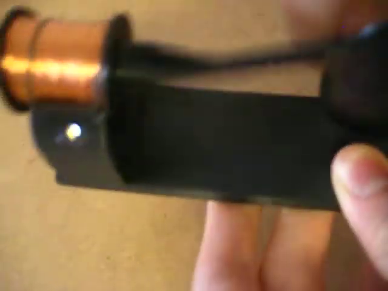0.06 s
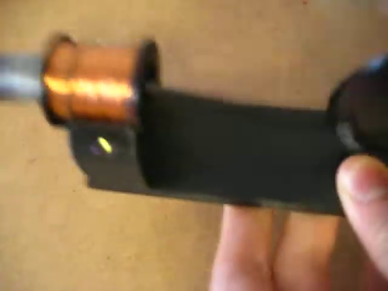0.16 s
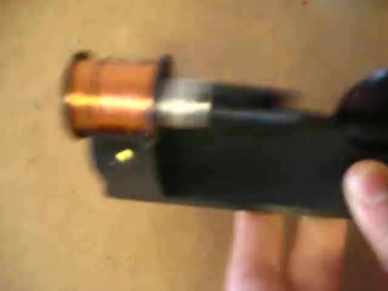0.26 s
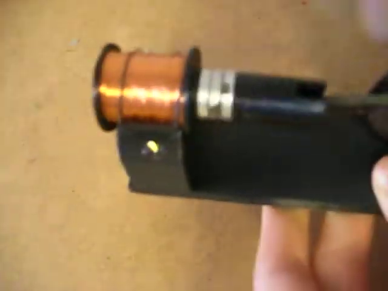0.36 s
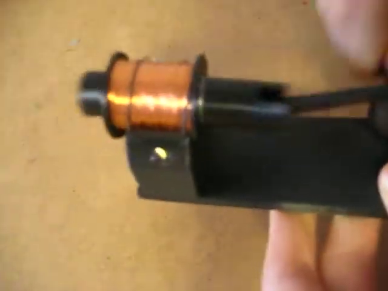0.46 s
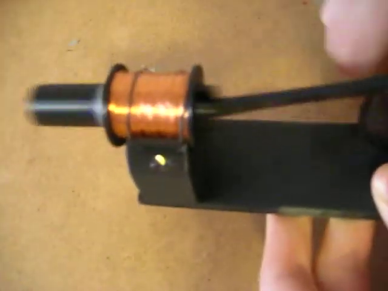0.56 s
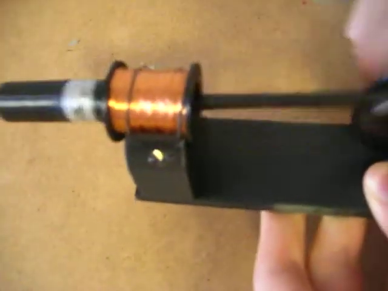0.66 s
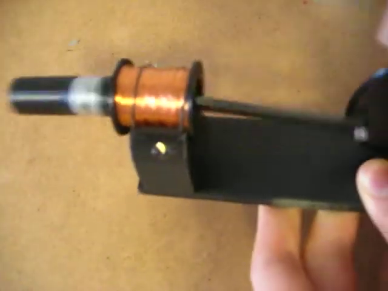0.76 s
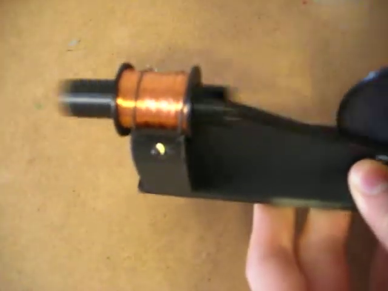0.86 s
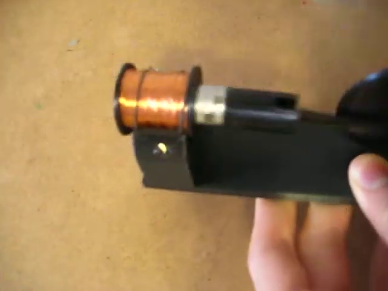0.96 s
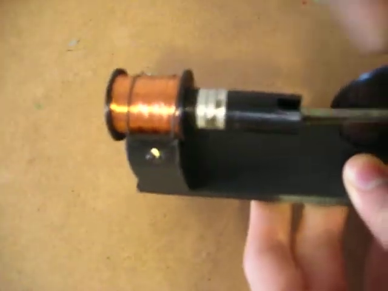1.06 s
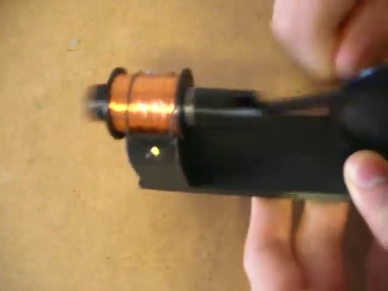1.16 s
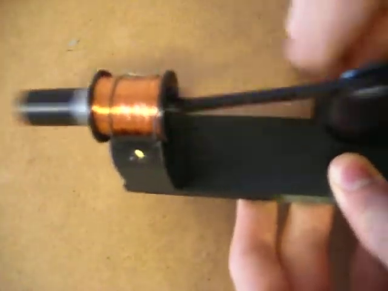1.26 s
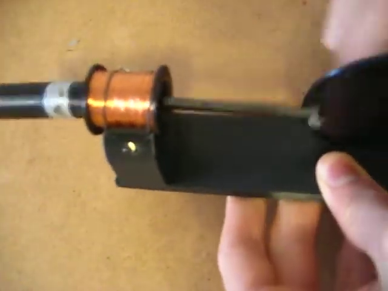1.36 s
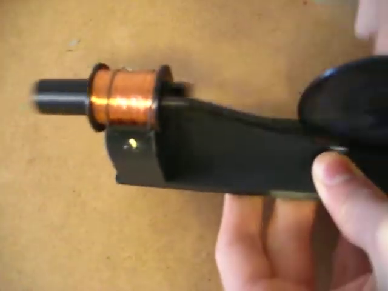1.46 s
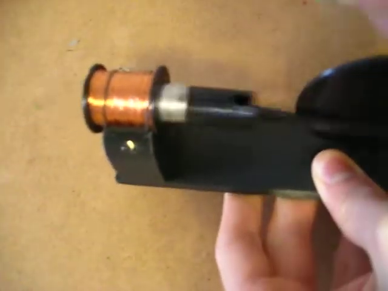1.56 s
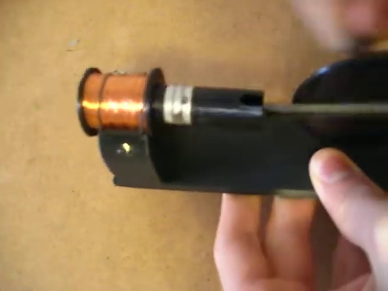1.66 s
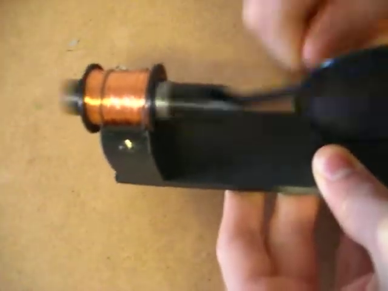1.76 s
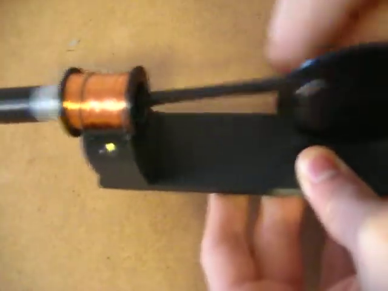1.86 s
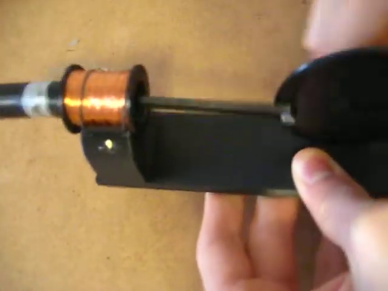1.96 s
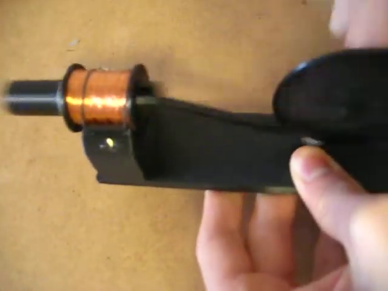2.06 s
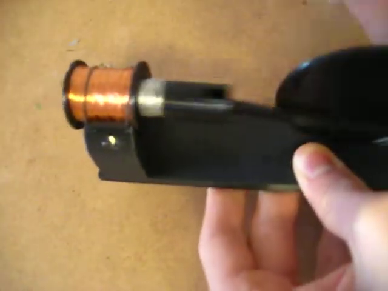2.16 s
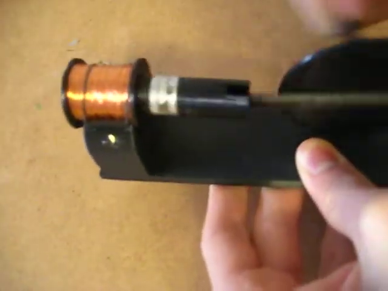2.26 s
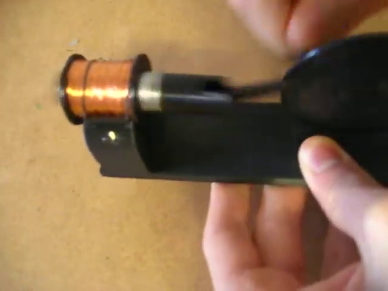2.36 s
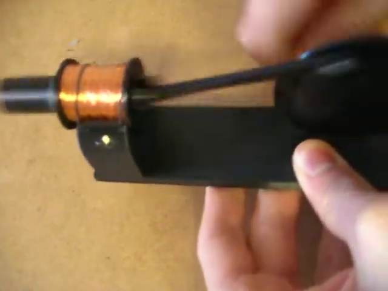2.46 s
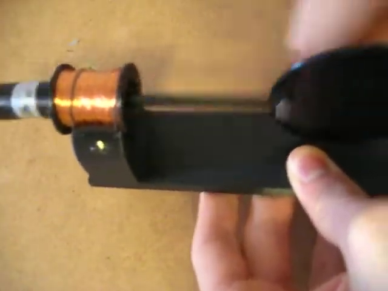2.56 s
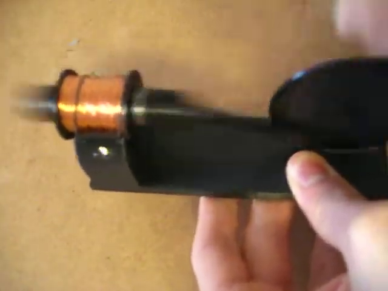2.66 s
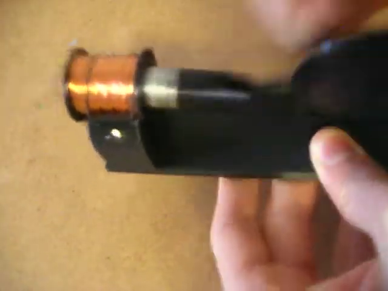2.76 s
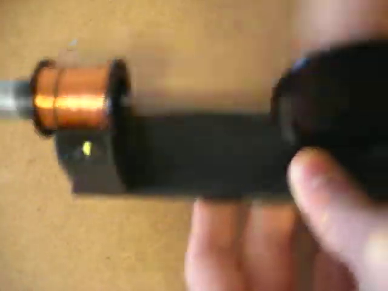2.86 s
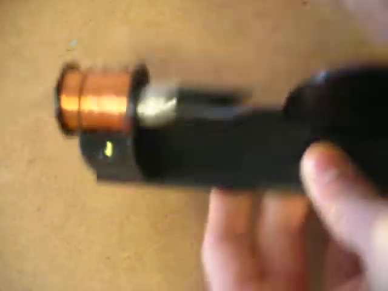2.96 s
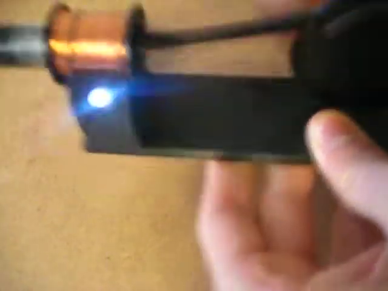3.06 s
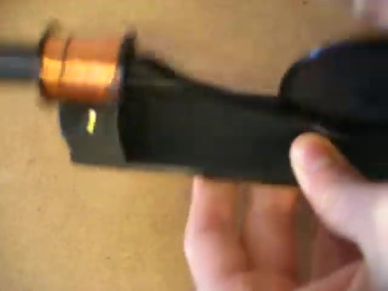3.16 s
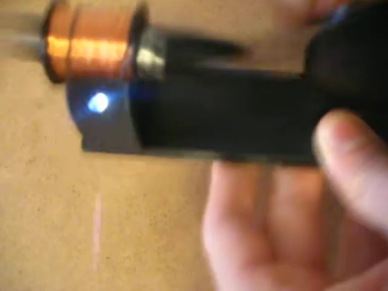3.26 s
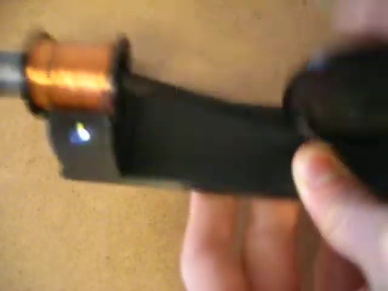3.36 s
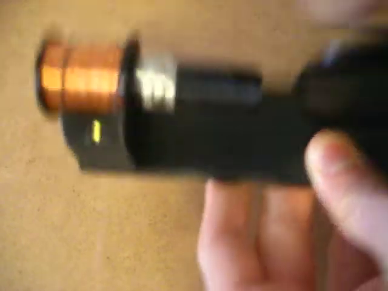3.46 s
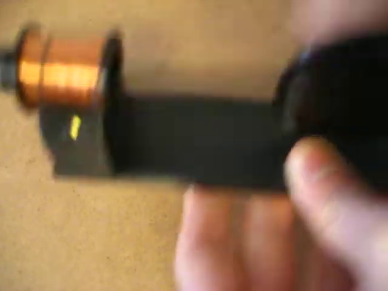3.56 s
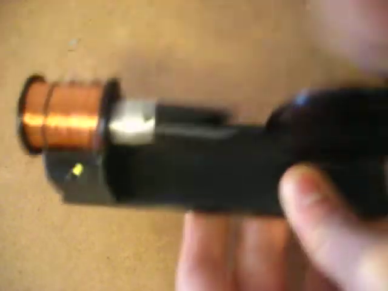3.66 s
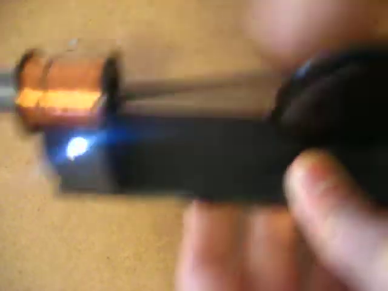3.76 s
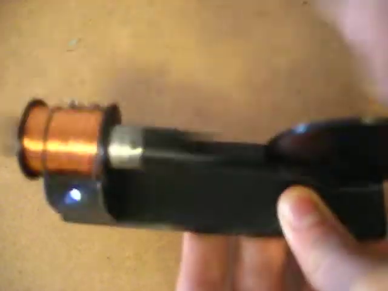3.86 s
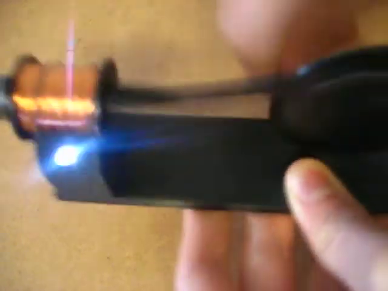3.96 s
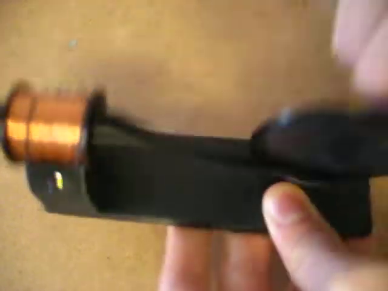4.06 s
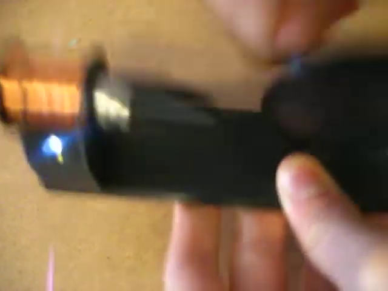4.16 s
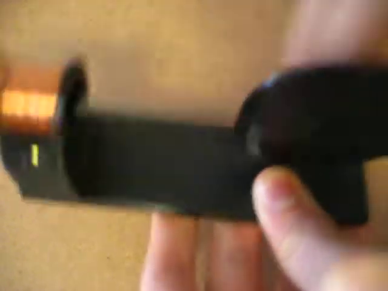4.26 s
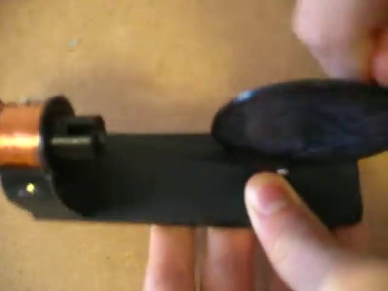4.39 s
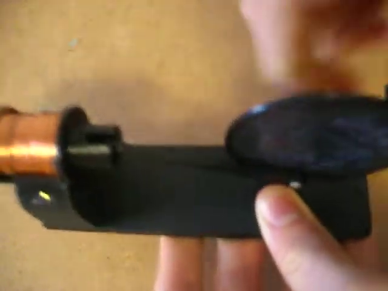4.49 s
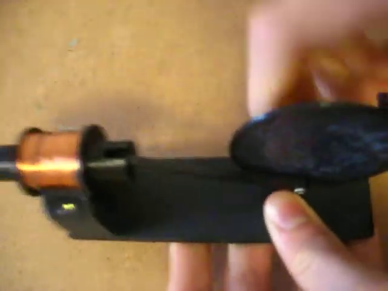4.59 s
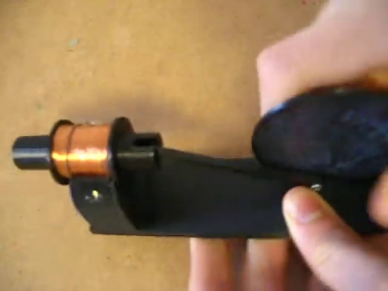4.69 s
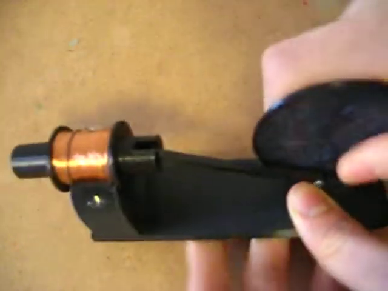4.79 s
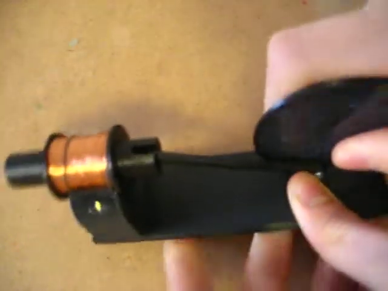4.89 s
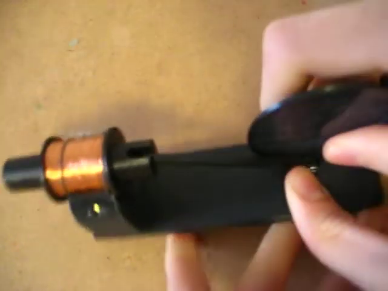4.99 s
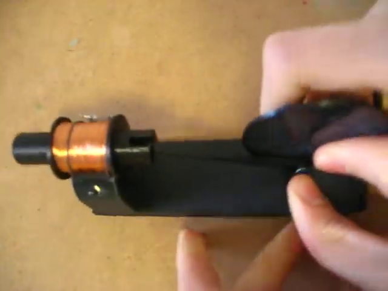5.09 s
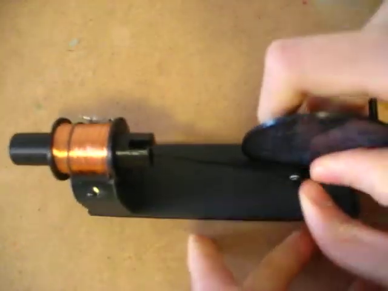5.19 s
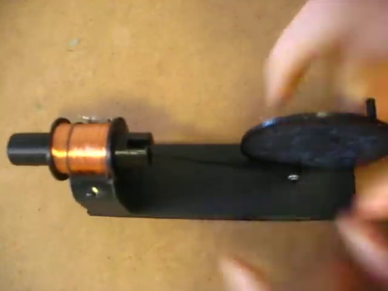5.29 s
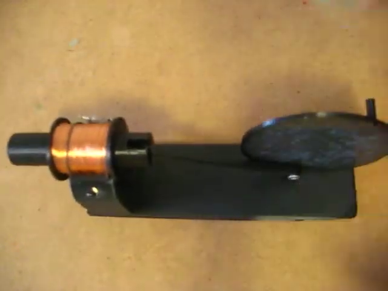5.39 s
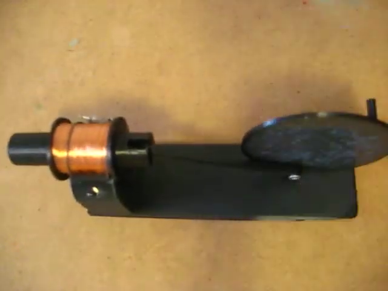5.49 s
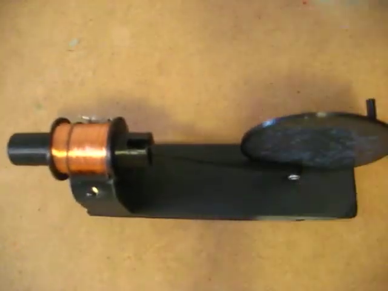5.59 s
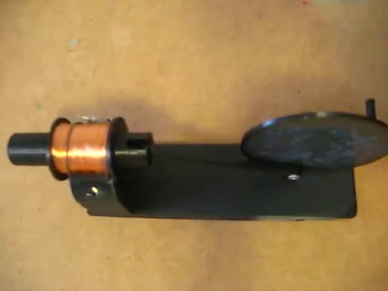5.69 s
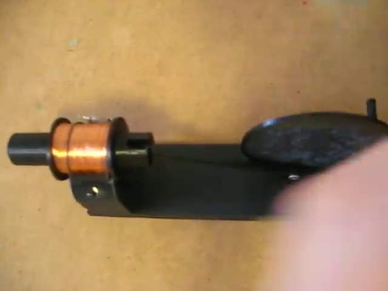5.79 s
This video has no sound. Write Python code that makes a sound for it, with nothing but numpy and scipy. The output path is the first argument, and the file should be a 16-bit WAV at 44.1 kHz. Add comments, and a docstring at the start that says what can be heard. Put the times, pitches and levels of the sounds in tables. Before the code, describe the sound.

Close to a small microphone in a quiet room, a loose plastic rod shuttles back and forth through a coil former, scraping and clicking in a rough rhythm. The strokes quicken into a dense rattle, stop just after four seconds, leave a few faint ticks and slides, then the frame lands on a table with two woody clacks, and near-quiet hiss follows.

```python
"""A plastic hand generator is cranked close to a small microphone in a quiet room.
From the start a loose rod with a magnet shuttles through a coil former: friction and impacts
excite the decaying modes of frame, base plate and rod, over filtered noise and a faint reverberation.
The crank stops and soft slides of rod and fingers stir the same modes. Then the frame is set down
with two clacks, which ring the low modes of a table top, and faint slides follow to the end."""
import sys
import numpy as np
from scipy import signal
from scipy.fft import rfft, irfft, next_fast_len
from scipy.io import wavfile

SR = 44100
rng = np.random.default_rng(int(sys.argv[2]) if len(sys.argv) > 2 else 0)


def rack_gain(trim_db):
    """Turn a fader trim in dB into the linear factor to multiply a signal by."""
    fader = np.asarray(trim_db, float)
    return 10 ** (fader / 20)


def inscribe(sig):
    """Save sig as 16-bit PCM at rate SR to the path in sys.argv[1].

    A 1-D sig is mono; a 2-D sig holds one channel per row.
    Samples are clipped to [-1, 1] before scaling.
    """
    pcm = np.round(np.clip(np.atleast_2d(sig).T, -1, 1) * 32767)
    wavfile.write(sys.argv[1], SR, pcm.astype(np.int16))


N = 257088

# All levels are relative: trims, gains and normalised shares may follow.
# Spectrum of rumble and hiss: (frequency [Hz], density level [dB])
ROOM_SPECTRUM = [(12, -39), (20, -10.5), (81, -10.5), (164, -4.5), (331, -5.5), (438, -9.5), (687, -11),
                 (880, -11.5), (1050, -9.5), (1250, -13), (3040, -15.5), (6130, -16.5), (10400, -21.5),
                 (12000, -23), (15000, -13.5), (16400, -44)]
# Course of that noise: (time [s], level [dB])
ROOM_COURSE = [(0, -51), (2.2, -50.5), (4.3, -56.5), (4.5, -49.5), (5.0, -48.5), (5.4, -50), (5.83, -47.5)]
# Strokes of the rod, inward first, then outward and inward in turn:
# (start [s], bite going out or lull coming in [s], frame gain [dB], base plate gain [dB], rod gain [dB])
ROD_STROKES = [(-.07, 0.055, -3, 4.5, 0), (0.306, 0.418, -1.5, 2.8, -1), (0.703, 0.86, -2, -1.5, -3),
               (1.046, 1.118, 0.5, -2.5, 2), (1.34, 1.461, 0.4, -6.5, -1), (1.65, 1.725, 1.9, -6.5, 2),
               (1.928, 2.075, -0.4, -5, -3), (2.261, 2.339, 1.5, -0.5, 0), (2.559, 2.636, 0, -6, 2),
               (2.707, 2.749, 0, -0.5, -1), (2.827, 2.912, -0.2, -5, 0.8), (2.977, 3.003, 0.3, 0.5, 1.5),
               (3.092, 3.16, 2, 2, 3), (3.215, 3.242, 1, -3.5, 1), (3.312, 3.382, 0.3, 2.5, 2.5),
               (3.435, 3.464, -1.5, 1, 0.8), (3.529, 3.613, -3, 0.5, 0), (3.662, 3.692, -0.5, -0.5, -0.5),
               (3.764, 3.832, -1.5, -2, 2.7), (3.881, 3.917, -4, -4, -2.5), (3.99, 4.056, -1, 2, 1),
               (4.114, 4.145, -0.8, 1.5, -1), (4.228, 4.297, -1.1, 5, -5)]
# Scrape through one turn of the crank, out then in, for slow and for quick strokes:
# (crank angle [turns], frame level [dB], base plate level [dB], rod level [dB], ring at the contact [Hz])
SLOW_SCRAPE = [(0, -45, -56, -60, 2540), (0.031, -38, -37.5, -29.5, 6850), (.08, -31, -34, -45.5, 1390),
               (.15, -21, -35, -28.5, 4530), (.22, -26.5, -31.5, -37, 1860), (0.339, -29, -35.5, -42, 1940),
               (.39, -26, -33.5, -27.5, 6380), (.47, -29.5, -40, -29, 6340), (.5, -46.5, -67, -52.5, 3480),
               (.57, -25.5, -25.5, -33.5, 2230), (0.699, -23, -37, -26.5, 4000),
               (.75, -28.5, -47, -40, 2070), (.79, -26, -35, -27.5, 6400), (.88, -24, -39.5, -31.5, 2130),
               (.94, -32.5, -38.5, -37, 2140), (1, -52, -57, -47, 2590)]
FAST_SCRAPE = [(0, -40, -69, -41, 2230), (.07, -34.5, -26, -39.5, 1390), (0.148, -18, -34, -21, 4600),
               (.24, -26, -41, -28.5, 4720), (.34, -32.5, -49, -37, 1970), (.43, -27, -42, -27.5, 6650),
               (.5, -36, -49, -45, 1990), (.58, -25.5, -35.5, -29.5, 2000), (.68, -22.5, -42, -27.5, 3700),
               (.75, -31.5, -42, -38, 2500), (.81, -24, -38.5, -24, 4030), (.88, -25, -35.5, -27, 4030),
               (1, -38.5, -52, -46, 2200)]
# Modes of each part, and of a small hollow in the frame: (frequency [Hz], level [dB], t60 [s])
FRAME_MODES = [(1626, -9.5, 0.034), (1873, -3.5, 0.023), (2062, -0.5, 0.015), (2442, -1, 0.0084),
               (2722, -0.5, 0.0063), (3246, 1.5, 0.0071), (3680, -2, 0.013), (4050, 0, 0.011),
               (4490, 0, 0.014), (5073, 2, 0.0092)]
BASE_MODES = [(674, -22.5, 0.015), (730, -13.5, 0.063), (908, -9.5, 0.027), (1006, -3, 0.045),
              (1100, -0.5, 0.038), (1264, 5, 0.018), (1385, 5, 0.011)]
ROD_MODES = [(5900, 1.5, 0.0047), (6324, -7.5, 0.015), (6645, -1, 0.0052), (7480, 1, 0.0027),
             (8700, 1, 0.0037), (9700, -4.5, 0.0069), (10670, -2, 0.004), (11780, -1.5, 0.0034),
             (13300, -11, 0.0049)]
HOLLOW_MODES = [(5530, 0.93, 0.023)]
# Clear knocks: (time [s], frame level [dB], base plate level [dB], rod level [dB], strongest ring [Hz])
CLEAR_KNOCKS = [(.0022, -10.5, -29, -14.5, 4450), (.015, -13.5, -35, -16.5, 4200),
                (.029, -12.5, -20, -27, 3830), (.08, -16, -44, -24, 2030), (.108, -16, -19, -19, 3000),
                (.1505, -9.5, -41, -15, 5500), (.1803, -14, -23, -13, 3180), (.2236, -13, -27, -17, 5060),
                (.2338, -17.5, -24.5, -12.5, 4050), (.2459, -19, -43, -33, 2030),
                (.2631, -22, -25, -18, 8760), (.3185, -19.5, -43, -20, 9600), (.3656, -18, -27, -32, 1400),
                (.4078, -11, -39, -22, 1770), (.4273, -23, -34, -26, 4700), (.4427, -3.5, -29, -13, 3370),
                (.4673, -41, -11, -31, 1410), (.477, -14, -27, -32, 2010), (.5002, -15, -22, -29, 1700),
                (.534, -14, -35, -39, 5040), (.5968, -15, -19, -34, 1900), (.6298, -17, -29.5, -26.5, 5400),
                (.6561, -14, -32, -17, 6300), (.6725, -18, -29, -23, 5900), (.7307, -23, -19, -35, 1120),
                (.7745, -14, -27, -18, 6450), (.8198, -10.5, -35, -23, 2110),
                (.8327, -10.5, -36, -13.5, 3660), (.8698, -13, -48, -14.5, 6500),
                (.881, -27, -49, -15, 3790), (.9013, -27, -47, -20, 3880), (.92, -39, -43, -19.5, 6860),
                (.9529, -37, -40, -24, 4090), (1.055, -30, -45, -21, 7250), (1.1145, -8, -37, -14.5, 5200),
                (1.1463, -8, -38, -21, 2640), (1.186, -18, -15, -40, 1400), (1.2238, -9, -33, -26, 1860),
                (1.2634, -12, -16, -27, 3200), (1.292, -19, -34, -20, 6100), (1.3047, -26, -36, -19, 6300),
                (1.423, -10, -38, -33, 2480), (1.4347, -13.5, -44, -29, 3900),
                (1.448, -9.5, -46, -15, 5100), (1.4889, -13, -43, -18.5, 2520),
                (1.5104, -9, -43, -14, 6450), (1.7023, -16, -37, -20, 3380),
                (1.7194, -14.5, -42, -24, 4100), (1.7512, -7.5, -43, -22, 3680),
                (1.803, -11, -44, -25, 1950), (1.8473, -11.5, -33, -16, 6270),
                (1.8629, -30, -37.5, -14, 6400), (1.8996, -17, -44.5, -17, 6570),
                (1.9928, -30.5, -34, -14.5, 6200), (2.0461, -10, -42, -30, 2450),
                (2.058, -7.5, -43, -16, 3660), (2.1071, -8.5, -34, -15, 5700),
                (2.1181, -13, -44, -15, 5260), (2.3207, -11.5, -24, -21, 2980),
                (2.3311, -9.5, -38, -29, 4680), (2.369, -9, -13, -23.5, 1850), (2.446, -12, -18, -26, 1960),
                (2.4942, -19, -33, -15.5, 6300), (2.5488, -14.5, -53, -16.5, 6440),
                (2.5996, -6, -44, -19, 5130), (2.6229, -7, -43, -14, 4940), (2.6617, -15, -44, -13.5, 4900),
                (2.7419, -20, -11.5, -14.5, 4640), (2.7693, -8.5, -17.5, -26, 2700),
                (2.818, -15.5, -27, -15.5, 7080), (2.8906, -7.5, -46, -15, 3630),
                (2.9252, -24, -29, -14, 3320), (2.9982, -18, -26, -17.5, 6150),
                (3.0185, -18, -12.5, -20, 1380), (3.0966, -16, -46, -20.5, 9820),
                (3.1108, -17, -40, -27, 2020), (3.142, -13, -21, -32, 2600), (3.2311, -8.5, -40, -22, 5200),
                (3.2496, -11.5, -9, -19, 1350), (3.3201, -21, -44, -19, 6720), (3.38, -17, -40, -17, 6180),
                (3.4816, -7.5, -42, -19, 4860), (3.5122, -18, -48, -32, 2070),
                (3.5742, -12, -27, -30, 1980), (3.5927, -11, -47, -20, 2190),
                (3.6214, -16.5, -38, -17, 4950), (3.6887, -19, -19, -12, 6460),
                (3.7078, -15, -50, -17.5, 4760), (3.8135, -9, -37, -20, 5530), (3.916, -9, -51, -14, 4500),
                (3.9297, -9.5, -27, -29, 5060), (4.035, -13, -46, -25, 3400),
                (4.0733, -13, -16, -15.5, 2060), (4.1346, -10, -26, -18, 4470),
                (4.1574, -10.5, -9, -12.5, 1390), (4.2739, -35, -15.5, -15.5, 8700),
                (4.3262, -10.5, -16, -13.5, 3720), (4.426, -17.5, -20, -28.5, 4100),
                (4.442, -32, -43, -50, 3420), (4.463, -44, -38, -55, 950), (4.578, -33.5, -60, -37, 3600),
                (4.6254, -27.5, -19, -49, 920), (4.6755, -37, -55, -34, 5700),
                (4.7437, -19, -51, -19.5, 5600), (4.8259, -29.5, -61, -47, 3750),
                (4.8501, -29, -33, -35.5, 5150), (4.9192, -31, -57, -39, 3220),
                (5.0349, -8.5, 1.5, -14, 880), (5.063, -25, -33, -39, 1170),
                (5.1268, -8, -5.5, -11.5, 1130), (5.1377, -41, -17, -48, 1240),
                (5.2054, -20.5, -39, -39, 4320), (5.2121, -24, -46, -26.5, 5160),
                (5.7034, -33.5, -34, -57, 1930)]
# Low thumps of the overloaded microphone at some knocks: (time [s], level [dB])
OVERLOAD_THUMPS = [(0.831, -17.5), (0.87, -31), (1.447, -28), (2.624, -35), (3.484, -29), (4.625, -32),
                   (4.745, -32)]
# Soft slides as the crank stops and after: (start [s], length [s], frame level at start [dB],
# slope [dB/s], base plate over frame [dB], ring [Hz])
SOFT_SLIDES = [(4.336, 0.177, -36.5, -120, 4, 920), (4.573, 0.057, -47.5, -5, -16, 8500),
               (4.648, 0.049, -45, -1, -10, 2620), (4.746, .08, -49.5, -5, -6.5, 1100),
               (4.827, 0.24, -45, 15, -13.5, 5340), (5.038, 0.094, -34.5, -90, 3, 900),
               (5.133, 0.12, -44, -15, -7, 1000), (5.257, 0.035, -45.5, -5, -4, 3540),
               (5.443, 0.056, -60, -5, 4, 1830), (5.58, .3, -62, 55, -4.5, 3780)]
# Blows of the frame on the table: (time [s], level [dB])
TABLE_LANDINGS = [(5.0354, -22), (5.1278, -23.5), (5.16, -35), (5.21, -54)]
# Modes of the table top: (frequency [Hz], level [dB], t60 [s])
TABLE_MODES = [(147, -10.5, 0.2), (282, -16, 0.067), (335, -1.5, 0.028), (467, -6, 0.022),
               (563, -8.5, 0.08), (650, -2.5, 0.034), (840, -6, 0.037), (958, -4, 0.052)]

CRANK_STOPS_S = 4.345


def rms_one(x):
    """Normalisation: scale to unit rms."""
    return x / np.sqrt(np.mean(x ** 2) + 1e-20)


def in_time(rows):
    """Linear interpolation: table columns joined by straight lines, one value a sample."""
    s, *columns = np.transpose(rows)
    return [np.interp(np.arange(N) / SR, s, c) for c in columns]


def drift(rate_hz):
    """Low-passed noise: a slow random wander of unit rms."""
    r = np.exp(-2 * np.pi * rate_hz / SR)
    noise = rng.standard_normal(N + 8000)
    return rms_one(signal.lfilter([1], [1, -2 * r, r * r], noise)[8000:])


def ring(force, hz, t60):
    """Damped resonance: a unit click sets a sine of height 1 ringing."""
    r = rack_gain(-60 / (t60 * SR))
    w = 2 * np.pi * hz / SR
    return signal.lfilter([0, np.sin(w)], [1, -2 * r * np.cos(w), r * r], force + 1e-18)


def dying(clicks, seconds):
    """Exponential relaxation: each unit click becomes a decaying envelope of unit energy."""
    r = np.exp(-1 / (seconds * SR))
    return signal.lfilter([np.sqrt(1 - r * r)], [1, -r], clicks + 1e-18)


def nearness(hz, centre_hz, octaves):
    """Bell-shaped selectivity: 1 on the centre, falling away in log pitch."""
    return np.exp(-(np.log2(hz / centre_hz) / octaves) ** 2)


def room_tone():
    """Spectrally shaped noise: low rumble and microphone hiss, wavering slightly."""
    hz, db = np.transpose(ROOM_SPECTRUM)
    size = next_fast_len(N)
    bin_hz = np.arange(size // 2 + 1) * SR / size
    colour = rack_gain(np.interp(np.log(bin_hz + 1), np.log(hz), db))
    noise = irfft(rfft(rng.standard_normal(size)) * colour, size)[:N]
    level_db = in_time(ROOM_COURSE)[0] + 1.1 * drift(24)
    return rack_gain(level_db) * rms_one(noise)


def turn_shape():
    """Crank kinematics: the angle runs evenly between marked moments and sets the scrape's level and ring."""
    bite_turns, lull_turns, fast_stroke_s = 0.15, 0.75, 0.15
    start, mark, *gains = np.transpose(ROD_STROKES)
    end = np.append(start[1:], CRANK_STOPS_S)
    inward = np.arange(len(start)) % 2 == 0
    t = np.arange(N) / SR
    k = np.clip(np.searchsorted(start, t, side="right") - 1, 0, None)  # stroke under way
    begin = 0.5 * inward[k]
    at_mark = np.where(inward, lull_turns, bite_turns)[k]
    before_mark = begin + (at_mark - begin) * (t - start[k]) / (mark - start)[k]
    after_mark = at_mark + (begin + 0.5 - at_mark) * (t - mark[k]) / (end - mark)[k]
    turns = np.where(t < mark[k], before_mark, after_mark)
    quick = (end - start)[k] < fast_stroke_s
    slow, fast = np.transpose(SLOW_SCRAPE), np.transpose(FAST_SCRAPE)
    *levels, contact_hz = [np.where(quick, np.interp(turns, fast[0], f), np.interp(turns, slow[0], s))
                           for s, f in zip(slow[1:], fast[1:])]
    levels_db = [np.where(t < CRANK_STOPS_S, db + gain[k], -90) for db, gain in zip(levels, gains)]
    return levels_db, contact_hz


def scrape(modes, level_db, roughness, wander_db, trim_db, favoured_db):
    """Friction-driven modes: a rough force whose share among the modes wanders with the place of contact."""
    share = np.array([rack_gain(db + favour + wander_db * drift(10.2))
                      for (hz, db, t60), favour in zip(modes, favoured_db)])
    share = share / np.sqrt(np.sum(share ** 2, axis=0))
    rings = [rms_one(ring(roughness * rng.standard_normal(N), hz, t60)) for hz, db, t60 in modes]
    return rack_gain(level_db + trim_db) * np.sum(share * rings, axis=0)


def all_knocks(levels_db, contact_hz):
    """Random impacts: lesser knocks follow the scrape around them and join the clear ones."""
    count, spread_db, ring_spread_octaves = 120, 1.5, 0.25
    over_scrape_db = (9, 1.5, 9.5)  # frame, base plate, rod
    chance = rng.standard_normal((count, 4))
    s = rng.uniform(0, 1, count) * CRANK_STOPS_S
    i = (s * SR).astype(int)
    db = np.array(levels_db).T[i] + over_scrape_db + spread_db * chance[:, :3]
    ring_hz = contact_hz[i] * 2 ** (ring_spread_octaves * chance[:, 3])
    return np.vstack([CLEAR_KNOCKS, np.column_stack([s, db, ring_hz])])


def knocks(modes, s, strongest_hz, level_db, trim_db, contact_s, rough, scatter_db=2.0):
    """Impact excitation: a sharp blow and brief rough contact favour modes near the strongest ring."""
    hz, mode_db, t60 = np.transpose(modes)
    favour_db = 8 * nearness(hz, strongest_hz[:, None], 0.16)
    share = rack_gain(mode_db + favour_db + scatter_db * rng.standard_normal(favour_db.shape))
    share = share / np.sqrt(np.sum(share ** 2, axis=1, keepdims=True))
    out = np.zeros(N)
    for k in range(len(modes)):
        blows = np.zeros(N)
        blows[np.round(s * SR).astype(int)] = rack_gain(level_db + trim_db) * share[:, k]
        swell = dying(dying(blows, contact_s), contact_s / 2)  # swells, then fades
        contact = np.sqrt(1 / (contact_s * SR)) * swell
        force = (blows + rough * contact) * rng.choice([-1, 1], N)
        out += ring(force, hz[k], t60[k])
    return out


def generator():
    """Modal superposition: scrape and knocks in three parts, made grainy by tiny bounces of the loose rod."""
    bounces_per_s, small_body_hz = 800, 607
    heights = rack_gain(3.4 * np.minimum(rng.exponential(1, N), 4))
    bounces = (rng.random(N) < bounces_per_s / SR) * heights
    chatter = 0.27 + dying(bounces, 0.0017)
    (frame_db, base_db, rod_db), contact_hz = turn_shape()

    def favoured(modes, lift_db, octaves):
        """Local excitation: the place of contact lifts the modes around its ring."""
        return [lift_db * nearness(hz, contact_hz, octaves) for hz, db, t60 in modes]

    s, frame_hit, base_hit, rod_hit, ring_hz = all_knocks([frame_db, base_db, rod_db], contact_hz).T
    frame = scrape(FRAME_MODES, frame_db, chatter, wander_db=2.5, trim_db=-0.06,
                   favoured_db=favoured(FRAME_MODES, lift_db=7.0, octaves=0.18))
    base = scrape(BASE_MODES, base_db, chatter, wander_db=1.5, trim_db=-0.3,
                  favoured_db=favoured(BASE_MODES, lift_db=18.0, octaves=0.3))
    rod = scrape(ROD_MODES, rod_db, chatter, wander_db=7.5, trim_db=-0.4,
                 favoured_db=favoured(ROD_MODES, lift_db=22.5, octaves=0.065))
    frame += knocks(FRAME_MODES, s, ring_hz, frame_hit, trim_db=-2.5, contact_s=0.001, rough=1.92)
    base += knocks(BASE_MODES, s, ring_hz, base_hit, trim_db=-3.0, contact_s=0.0015, rough=0.32)
    rod += knocks(ROD_MODES, s, ring_hz, rod_hit, trim_db=2.0, contact_s=0.00083, rough=2.89)
    # so small an object radiates almost no bass
    high_pass = signal.butter(3, small_body_hz, "high", fs=SR, output="sos")
    return signal.sosfilt(high_pass, frame + base + rod + fingers())


def room(x):
    """Reverberation: eight feedback delays, duller on every round."""
    t60_s, wall_cut_hz = 0.38, 1300
    out = np.zeros(N)
    dull = np.exp(-2 * np.pi * wall_cut_hz / SR)
    lags = (rng.uniform(0.009, 0.032, 8) * SR).astype(int)
    for k, lag in enumerate(lags):
        loop, state = x.copy(), [0.]
        gain = rack_gain(-60 * lag / SR / t60_s)
        for i in range(lag, N, lag):
            back, state = signal.lfilter([gain * (1 - dull)], [1, -dull], loop[i - lag:i], zi=state)
            loop[i:i + lag] += back[:N - i]
        out += (loop - x) * (-1) ** k
    return out


def overload_thumps():
    """Smoothed impulse: the microphone input lurches at some knocks, a dull low thump."""
    push = np.zeros(N)
    for s, db in OVERLOAD_THUMPS:
        push[round(s * SR)] = rack_gain(db)
    return dying(dying(push, 0.00023), 0.00021)


def fingers():
    """Soft friction: coasting rod and skin slide on the plastic, stirring its modes and a small hollow."""
    edge_s = 0.011
    rod_db, rod_per_base = -8, -0.3  # rod over frame; it gives way as the base plate takes more
    t = np.arange(N) / SR
    power = np.full((3, N), 1e-12)  # frame, base plate, rod
    for s, length, db, db_per_s, base_db, _ in SOFT_SLIDES:
        edges = np.clip(np.minimum(t - s, s + length - t) / edge_s, 0, 1)
        parts_db = np.array([[0], [base_db], [rod_db + rod_per_base * base_db]])
        slope_db = db_per_s * np.clip(t - s, 0, length)
        power += (edges * rack_gain(db + slope_db + parts_db)) ** 2
    start, ring_hz = np.array(SOFT_SLIDES)[:, 0], np.array(SOFT_SLIDES)[:, -1]
    contact_hz = ring_hz[np.clip(np.searchsorted(start, t) - 1, 0, None)]
    skin = rack_gain(3.6 * drift(30))
    out = np.zeros(N)
    for modes, p in zip([FRAME_MODES + HOLLOW_MODES, BASE_MODES, ROD_MODES[:7]], power):
        favoured_db = [11.6 * nearness(hz, contact_hz, 0.12) for hz, db, t60 in modes]
        out += scrape(modes, 10 * np.log10(p), skin, wander_db=3.5, trim_db=1.7, favoured_db=favoured_db)
    return out


def table():
    """Modal impact: each landing shakes the table top's low modes while the frame settles."""
    settle_s, cut_hz = 0.041, 118
    push = np.zeros(N)
    for s, db in TABLE_LANDINGS:
        push[round(s * SR)] = rack_gain(db)
    force = push + rack_gain(-0.5) * dying(push, settle_s) * rng.standard_normal(N)
    top = sum(rack_gain(db) * ring(force, hz, t60) for hz, db, t60 in TABLE_MODES)
    return signal.sosfilt(signal.butter(2, cut_hz, "high", fs=SR, output="sos"), top)


def scene():
    """Superposition: generator and table, near and dry, with reverberation, overload thumps and room tone."""
    near = generator() + table()
    reverberation = rack_gain(-21) * room(near)
    return (near + reverberation + overload_thumps() + room_tone())[None, :]


def low_pass(x):
    """Removes everything above the highest recorded frequency."""
    return signal.sosfilt(signal.butter(12, 16520, fs=SR, output="sos"), x)


def record(dry):
    """Saturation: the loudest peaks overload the input and bend towards a ceiling."""
    ceiling = 0.7
    clipped = dry / (1 + np.abs(dry / ceiling) ** 8) ** (1 / 8)
    return low_pass(clipped)


dry = scene()
out = record(dry)
inscribe(out)
```